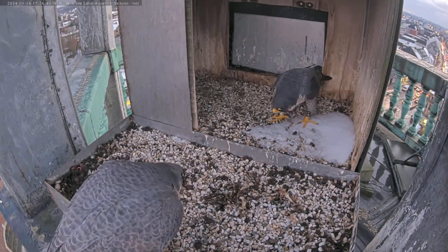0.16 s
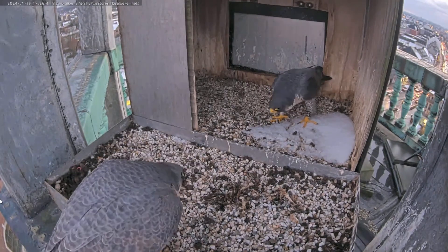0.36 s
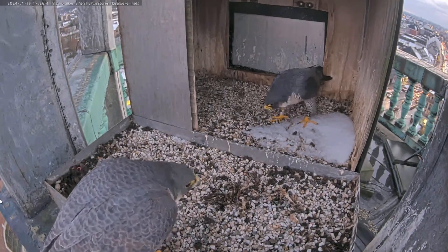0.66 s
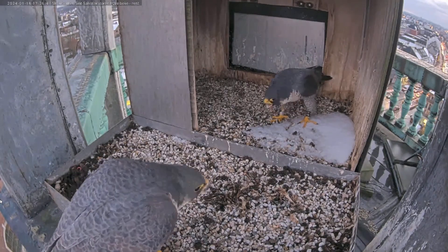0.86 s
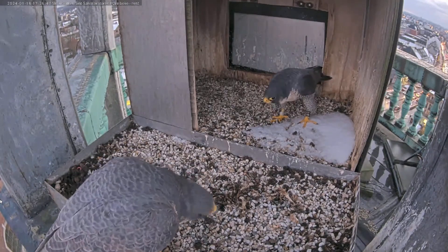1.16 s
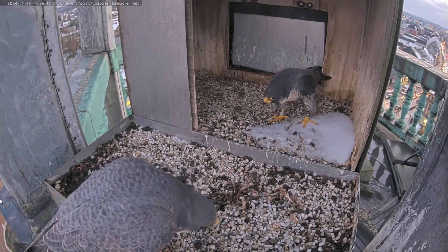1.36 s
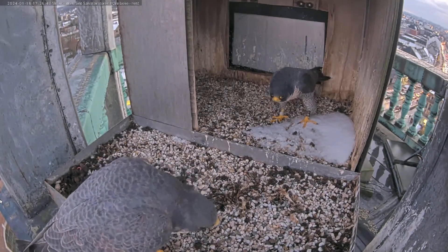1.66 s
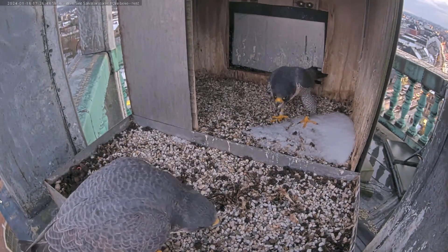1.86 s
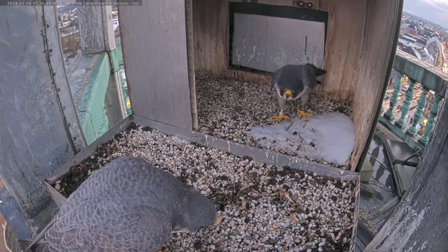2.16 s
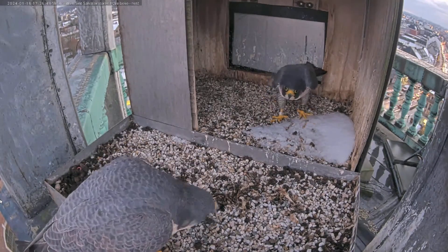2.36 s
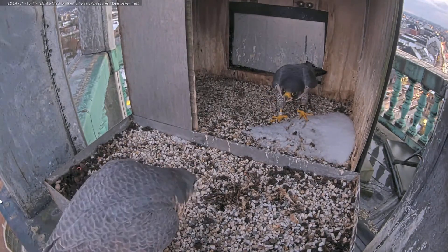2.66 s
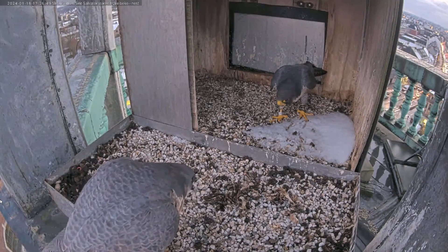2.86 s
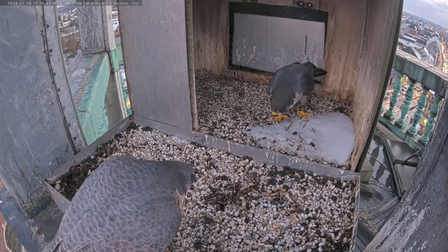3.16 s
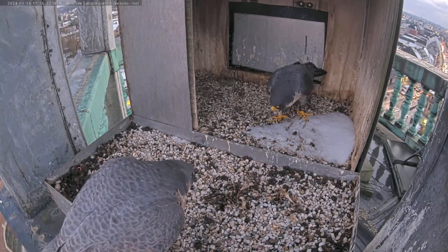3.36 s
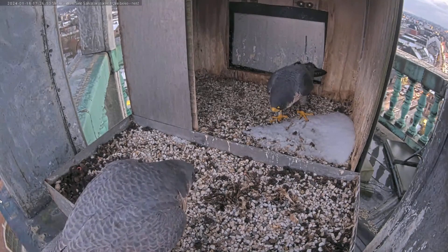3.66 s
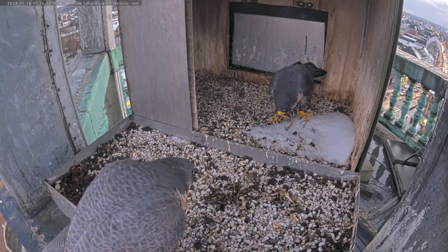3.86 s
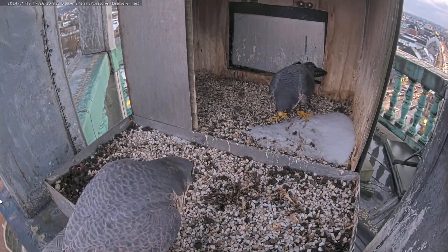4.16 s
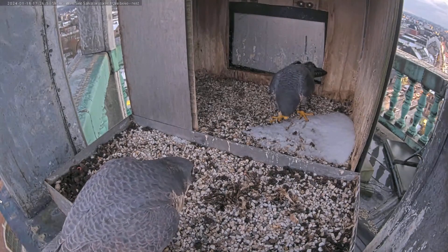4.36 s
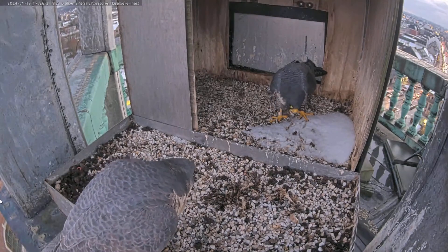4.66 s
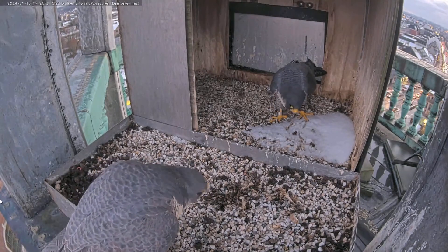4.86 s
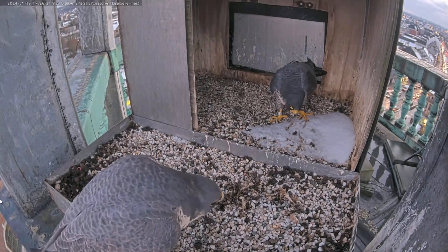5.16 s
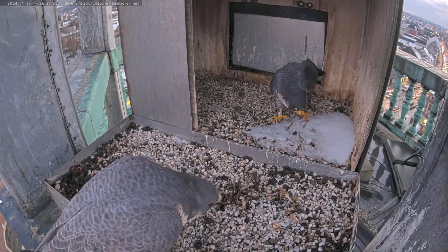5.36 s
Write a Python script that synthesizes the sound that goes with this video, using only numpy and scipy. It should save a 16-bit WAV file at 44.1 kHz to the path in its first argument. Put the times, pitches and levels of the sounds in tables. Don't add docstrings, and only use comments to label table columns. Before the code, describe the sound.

Two falcons in a wooden nest box trade sharp, raspy chips and low grunts over a quiet town hum and soft wind rumble.

```python
import sys
import numpy as np
from scipy import signal
from scipy.io import wavfile

SR = 44100
rng = np.random.default_rng(int(sys.argv[2]) if len(sys.argv) > 2 else 0)


def to_linear_factor(level_db):
    exponent = np.asarray(level_db, float) / 20
    return 10 ** exponent


def generate_wav(signal):
    frames = np.transpose(np.atleast_2d(signal))
    scaled = np.clip(frames, -1, 1) * 32767
    pcm = np.round(scaled).astype(np.int16)
    wavfile.write(sys.argv[1], SR, pcm)


N = 242550

SLOW_HZ, FAST_HZ, PRESSED_HZ = 430, 660, 604.3


def rms_one(x):
    return x / np.sqrt(np.mean(x ** 2) + 1e-20)


def drift(rate_hz, count=N):
    r = np.exp(-2 * np.pi * rate_hz / SR)
    settling = 4000
    noise = rng.standard_normal(count + settling)
    return rms_one(signal.lfilter([1], [1, -2 * r, r * r], noise)[settling:])


def resonate(x, modes):
    out = 0
    for k, (hz, width_hz, level_db) in enumerate(modes):
        r = np.exp(-np.pi * width_hz / SR)
        b = np.array([1, 0, -1]) * (1 - r * r) / 2
        a = [1, -2 * r * np.cos(2 * np.pi * hz / SR), r * r]
        out = out + (-1) ** k * to_linear_factor(level_db) * signal.lfilter(b, a, x)
    return out


def add(out, start_s, sound):
    at = round(start_s * SR)
    out[at:at + len(sound)] += sound[:N - at]


def raised_sine(x):
    return np.sin(np.pi / 2 * np.clip(x, 0, 1)) ** 2


def town():
    # hz, density_db
    town_spectrum = [(20, 11.5), (114, 1), (258, -9.5), (430, -24), (900, -17), (2000, -18.5), (4900, -45),
                     (9500, -42)]
    hz_points, db_points = np.transpose(town_spectrum)
    limits_hz = 18 * 2 ** np.arange(0, 9.1, 1 / 3)
    white = rng.standard_normal((2, N))
    out = 0
    for k, (low, high) in enumerate(zip(limits_hz, limits_hz[1:])):
        third = signal.butter(3, [low, high], "band", fs=SR, output="sos")
        level_db = np.interp(np.log(low * high) / 2, np.log(hz_points), db_points)
        out = out + to_linear_factor(level_db) * signal.sosfilt(third, white[k % 2])
    return to_linear_factor(-47) * rms_one(out)


def rumble():
    # time_s, rumble_db
    gusts = [
        (0, -38),
        (.7, -39.5),
        (1.0, -51),
        (1.4, -43.5),
        (2.1, -54),
        (2.45, -41.5),
        (3.2, -53),
        (4.3, -50.5),
        (5.5, -45),
    ]
    time_s, level_db = np.transpose(gusts)
    hum = resonate(rng.standard_normal(N), [(106, 18, 0)])
    hum = resonate(hum, [(104, 28, 0)])
    return to_linear_factor(np.interp(np.arange(N) / SR, time_s, level_db) - 4.5) * rms_one(hum)


def space(x, t60_s, cut_hz, first_s):
    t = np.arange(SR // 2) / SR
    echoes = rng.standard_normal(len(t)) * to_linear_factor(-60 * t / t60_s) * (t > first_s)
    echoes = signal.sosfilt(signal.butter(1, cut_hz, fs=SR, output="sos"), echoes)
    return signal.fftconvolve(x, echoes / np.sqrt(np.sum(echoes ** 2)))[:N]


def surroundings(birds):
    # hz, width_hz, level_db
    box_modes = [(251, 65, 2.5), (460, 22, -11), (700, 33, -15.5), (1260, 27, -15.5), (1994, 30, -12.5)]
    box = to_linear_factor(-10.5) * space(birds, t60_s=.051, cut_hz=3500, first_s=.0021)
    yard = to_linear_factor(-53) * space(birds, t60_s=1, cut_hz=3000, first_s=.025)
    return box + yard + resonate(birds, box_modes)


def squeaks():
    # start_s, tick_db, third_partial_hz, squeak_over_tick_db
    squeak_events = [
        (0.0416, -49, 7300, -2.5),
        (0.3037, -39.5, 6320, -16),
        (0.8612, -49.5, 7640, -22),
        (1.4754, -34.5, 6050, -6.5),
        (2.2214, -45, 5440, -30.5),
        (2.8933, -38.5, 6330, -2.5),
        (4.1455, -43, 6440, -6),
        (4.8827, -40, 6510, -34),
        (4.9521, -46, 5530, -29),
        (5.166, -37, 6350, -9.5),
    ]
    out, t = np.zeros(N), np.arange(round(.024 * SR)) / SR
    beak_modes = [(2203, 660, 14), (4300, 1200, 1)]   # hz, width_hz, level_db
    for start, tick_db, third_hz, squeak_db in squeak_events:
        tick = rng.standard_normal(len(t)) * t / .0014 * np.exp(1 - t / .003)
        add(out, start, to_linear_factor(tick_db - 15) * resonate(tick, beak_modes))
        pitch_hz = third_hz / 3 * (1 - .04 * np.exp(-t / .0013) + .014 * drift(300, len(t)))
        phase = 2 * np.pi * np.cumsum(pitch_hz) / SR
        tone = np.sin(3 * phase) + to_linear_factor(-14.5) * np.sin(2 * phase) + to_linear_factor(-14) * np.sin(phase)
        swell = t / .0034 * np.exp(1 - t / .0059)
        add(out, start + .0044, to_linear_factor(tick_db + squeak_db) * swell * tone)
    return out


def pulsed(calls, throat, swell, jitter, rough, sag, closing_db, gain_db):
    # hz, width_hz, level_db
    bright_throat = [(5500, 1100, 4), (6600, 5800, 14), (8200, 3900, 17.5)]
    out = np.zeros(N)
    for first_hz, (start, end, level_db, last_hz, bright_db) in calls:
        length = end - start
        t = np.arange(round((length + .04) * SR)) / SR - .005
        rate_s = [-.005, .004, .36 * length, .52 * length, length, length + .012]
        rate_hz = [.86 * first_hz, .93 * first_hz, 1.05 * first_hz, last_hz, last_hz, sag * last_hz]
        rate = np.interp(t, rate_s, rate_hz)
        cycles = np.cumsum(rate * (1 + jitter * drift(290, len(t)))) / SR
        beat = np.floor(cycles).astype(int)

        strength = to_linear_factor(5 * np.sqrt(rough) * rng.standard_normal(len(t))[beat])
        pulses = np.diff(beat, prepend=0) * strength * np.sqrt(SR / rate)
        breathy = rng.standard_normal(len(t)) * np.exp(-1.5 * (cycles % 1)) * 1.7
        source = np.sqrt(1 - rough) * pulses + np.sqrt(rough) * breathy

        lag = np.arange(90)
        scatter = rng.standard_normal(90) * np.exp(-lag / 35) + 3.5 * (lag == 0)
        source = np.convolve(source, scatter)[:len(t)]

        closing = closing_db * (t / length - .4)
        body = 0
        for k, mode in enumerate(throat):
            tilt = to_linear_factor(-closing * np.log2(mode[0] / 1300))
            body = body + (-1) ** k * tilt * resonate(source, [mode])
        edge = to_linear_factor(-1.5 * closing) * resonate(resonate(source, bright_throat), bright_throat)
        voice = body / np.std(body[:round(length * SR)]) + to_linear_factor(bright_db - 21) * rms_one(edge)

        knots_s = [-.005, 0, .004, swell * length + .0025, .62 * length + .0039,
                   length + .0023, length + .023]
        envelope_db = np.interp(t, knots_s, [-52.5, -13.5, -4.5, -3.5, -5, -20, -41.5])
        add(out, start - .005, to_linear_factor(level_db + gain_db + envelope_db) * voice)
    return out


def grunts():
    # start_s, end_s, level_db, last_rate_hz, bright_db
    slow_grunts = [(.563, 0.59, -16, 465.6, -7), (0.615, 0.636, -19, 439, -10),
                   (.742, 0.771, -12, 642, -18.5), (1.269, 1.288, -17.5, 470, -11.5),
                   (1.312, 1.335, -22.5, 408, -22), (1.847, 1.882, -12, 701, -11.5),
                   (1.932, 1.952, -17, 460, -19.5), (1.983, 2.007, -18.5, 401, -26),
                   (2.544, 2.578, -12, 470, -8.5), (2.607, 2.626, -18.5, 430, -15.5),
                   (3.276, 3.306, -11.5, 657, -18), (3.317, 3.35, -15, 460, -12.5),
                   (3.741, 3.77, -14, 642, -12.5), (4.567, 4.598, -17, 399, -24.5),
                   (5.336, 5.35, -30.5, 429, -13.5), (5.351, 5.377, -16.5, 455.5, -11)]
    # start_s, end_s, level_db, last_rate_hz, bright_db
    pressed_grunts = [
        (2.701, 2.708, -14, 542, -8),
        (2.711, 2.735, -23.5, 395, -12),
        (4.589, 4.623, -14, 655, -17),
    ]
    # hz, width_hz, level_db
    grunt_throat = [(470, 220, -5), (900, 270, -2), (1324, 270, 4), (1967, 200, 8), (2520, 180, -1.5),
                    (2680, 140, -0.5), (3380, 230, -6), (3980, 100, -8.5), (4600, 250, -13),
                    (5700, 1200, -24)]
    calls = [(SLOW_HZ, call) for call in slow_grunts] + [(PRESSED_HZ, call) for call in pressed_grunts]
    return pulsed(calls, grunt_throat, swell=.3, jitter=.015, rough=.02, sag=.95, closing_db=3, gain_db=1.2)


def rasps():
    # start_s, end_s, level_db, last_rate_hz, bright_db
    chip_rasps = [(0.117, 0.143, -16.5, 390, -3), (0.229, 0.246, -23.5, 731, 6.5),
                  (0.4, 0.424, -24, 643, 9), (0.943, 0.986, -20, 620, 15), (.997, 1.023, -22.5, 660, -12),
                  (1.572, 1.6, -16.5, 401.6, -5.5), (2.048, 2.074, -15, 642, 0),
                  (2.294, 2.326, -21.5, 430, -13), (2.975, 2.991, -18, 660, 16.5),
                  (2.993, 3.02, -22, 463.5, 3), (3.447, 3.482, -16, 694, -8),
                  (3.873, 3.894, -10.5, 529, -3.5), (4.238, 4.257, -15.5, 626, -10),
                  (4.765, 4.79, -14, 547.7, -5.5), (5.026, 5.05, -18.5, 695, -12.5),
                  (5.242, 5.254, -25, 650, 14), (5.257, 5.28, -22, 481, -12), (5.4, 5.418, -25.5, 480, -7)]
    # start_s, end_s, level_db, last_rate_hz, bright_db
    slow_rasps = [
        (3.375, 3.398, -20, 742, -10.5),
        (4.647, 4.677, -17, 479, -2.5),
    ]
    # hz, width_hz, level_db
    rasp_throat = [(267, 130, -9.5), (716, 250, -6), (1147, 270, 1.5), (1650, 250, 4.5), (2070, 250, 4),
                   (2660, 230, 3), (3300, 900, -3.5), (4340, 450, -11.5)]
    calls = [(FAST_HZ, call) for call in chip_rasps] + [(SLOW_HZ, call) for call in slow_rasps]
    return pulsed(calls, rasp_throat, swell=.2, jitter=.05, rough=.1, sag=.45, closing_db=6, gain_db=2)


def whistle_notes():
    # start_s, length_s, settled_hz, peak_db, overtone_db
    openings = [(.103, .011, 3885, -8, -10), (.196, 0.022, 2997, -14.5, -15.5),
                (.21, 0.033, 2930, -27.5, -2.5), (.383, .016, 3660, -9.5, -10),
                (.935, 0.011, 3705, -9.5, -8.5), (.973, 0.0094, 3050, -7, -24),
                (1.544, 0.0053, 3280, -11.5, -17), (1.551, 0.0059, 3753, -9, -7),
                (2.033, 0.0064, 3876, -1, -15.5), (2.273, 0.0036, 3325, -11, -19),
                (2.689, .0043, 3707, -6.5, -14), (2.93, 0.022, 3120, -13.5, -15.5),
                (2.975, 0.0086, 3822, -2.5, -14.5), (3.439, 0.011, 3773, -3.5, -18.5),
                (3.858, 0.0098, 3210, -11, -14.5), (3.866, .008, 3900, -14, -8.5),
                (4.221, 0.011, 3620, -12, -9), (4.752, 0.01, 3763, -11, -6), (5.002, .014, 3102, -9, -20.5),
                (5.236, .008, 3730, -10, -2.5)]
    # start_s, length_s, settled_hz, peak_db, overtone_db
    lower_notes = [(.115, 0.0068, 2686, -3, -14.5), (.209, 0.027, 1969, -8, -16.5),
                   (.395, 0.024, 2514, -13.5, -7.5), (.943, 0.02, 2558, -4.5, -24),
                   (.958, 0.014, 2510, -25, -3), (.988, 0.025, 2018, -11, -15),
                   (1.554, 0.016, 2311, -3.5, -14.5), (2.041, 0.0094, 2602, -6, -11),
                   (2.282, 0.0093, 2386, -14, -17.5), (2.288, 0.022, 2068, -12.5, -14),
                   (2.693, 0.0052, 2627, -2.5, -22), (2.948, 0.018, 1987, -11.5, -12),
                   (2.982, 0.02, 2525, -6.5, -13), (3.449, 0.011, 2598, -4, -13),
                   (3.872, .0075, 2252, -5, -12.5), (3.886, .02, 2003, -12.5, -19.5),
                   (4.232, 0.012, 2460, -12, -4.5), (4.761, 0.0064, 2660, -5.5, -15),
                   (5.01, 0.023, 2039, -9.5, -12.5), (5.246, .011, 2441, -4.5, -10.5),
                   (5.263, .0093, 1967, -13.5, -32), (3.348, 0.016, 2383, -16, -15.5),
                   (3.362, 0.011, 2205, -11, -15.5), (5.391, 0.022, 2202, -9, -21.5)]
    # start_s, length_s, settled_hz, peak_db, overtone_db
    peeps = [(.003, 0.017, 1180, -42, -15), (.561, 0.0066, 1843, -16.5, -30.5),
             (.595, 0.0071, 2387, -9, -15), (.608, 0.013, 2220, -13.5, -20.5),
             (.618, 0.014, 2260, -25.5, -7), (.745, .011, 2366, -16, -26.5),
             (1.265, .0075, 1919, -14, -41.5), (1.936, 0.0073, 2710, -16.5, -34),
             (1.985, .007, 1914, -16, -24.5), (1.996, 0.0049, 2820, -24, -23),
             (2.545, 0.0082, 1790, -14.5, -21), (2.594, 0.01, 1310, -24.5, -21.5),
             (2.7, 0.0076, 1599, -7.5, -17.5), (3.373, 0.011, 2194, -22, -10.5),
             (4.578, 0.051, 2312, -16.5, -21), (4.62, 0.022, 2510, -20, -24.5),
             (4.634, 0.013, 2499, -7.5, -16.5), (5.369, 0.016, 2510, -17.5, -35)]
    kinds = [(openings, 9.0, .015), (lower_notes, 2.5, .016), (peeps, -5.5, .008)]
    found = []
    for table, glide, longest_s in kinds:
        for start, length, settled_hz, peak_db, over_db in table:
            first_hz = settled_hz * (1 + glide * min(length, longest_s))
            found.append((start, length, first_hz, settled_hz, peak_db, over_db))
    return found


def whistles():
    out = np.zeros(N)
    shake = .006 * drift(400)
    flutter_db = 2.5 * (drift(150) + .25 * drift(1500))
    for start, length, first_hz, settled_hz, peak_db, over_db in whistle_notes():
        t = np.arange(round((length + .005) * SR)) / SR - .003
        first = round(start * SR)
        at = slice(first, first + len(t))
        fall = np.minimum(np.exp(-(t - .12 * length) / (.2 * length + .001)), 2.2)
        pitch_hz = settled_hz + (first_hz - settled_hz) * fall
        phase = 2 * np.pi * np.cumsum(pitch_hz * (1 + shake[at])) / SR

        rise_s = .004 + .027 * abs(first_hz / settled_hz - 1)
        rise = raised_sine((t - t[0]) / rise_s)
        end = raised_sine((t[-1] - t) / .0045)
        depth = (settled_hz < 2800) * np.clip(.15 + .5 * t / length, 0, .8)
        swings = round(settled_hz / 660)
        end = end * (1 - depth * np.sin(phase / swings / 2) ** 6)

        overtones = np.sin(2 * phase) + to_linear_factor(-2) * np.sin(3 * phase) + to_linear_factor(-10) * np.sin(4 * phase)
        tone = np.sin(phase) + to_linear_factor(over_db) * overtones
        level_db = peak_db + .4 + flutter_db[at] - 3.7 * t / t[-1]
        add(out, start + t[0], to_linear_factor(level_db) * rise * end * tone)
    return out


def scene():
    birds = whistles() + squeaks() + grunts() + rasps()
    return (birds + surroundings(birds) + town() + rumble())[None]


def top_cut(x):
    return signal.sosfilt(signal.butter(12, 16640, fs=SR, output="sos"), x)


def record(dry):
    microphone = signal.cheby2(18, 70, 1.07 * 9500, fs=SR, output="sos")
    heard = signal.sosfilt(microphone, dry)
    overload = .765
    flattened = heard / (1 + np.abs(heard / overload) ** 32) ** (1 / 32)
    band_edge = signal.cheby2(14, 50, 16600, fs=SR, output="sos")
    return top_cut(signal.sosfilt(band_edge, flattened))


dry = scene()
out = record(dry)
generate_wav(out)
```